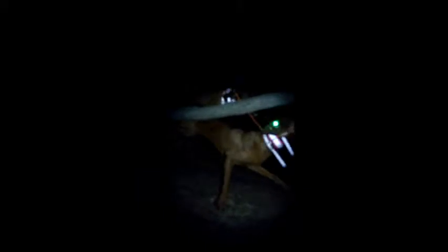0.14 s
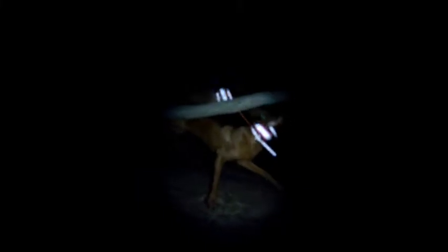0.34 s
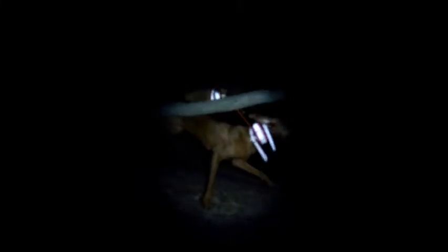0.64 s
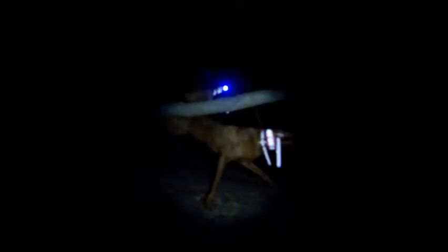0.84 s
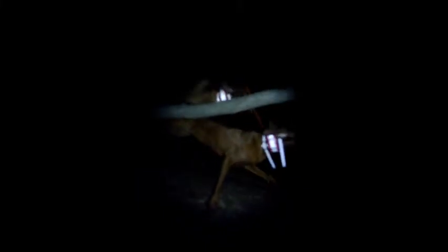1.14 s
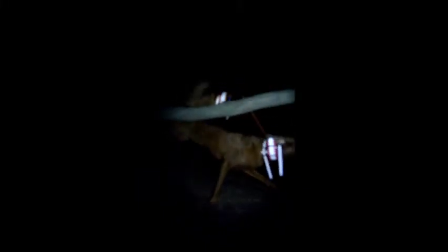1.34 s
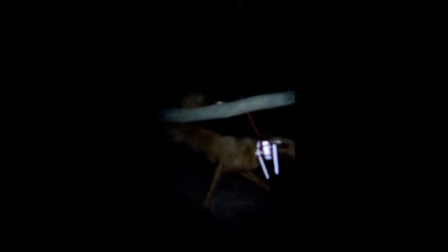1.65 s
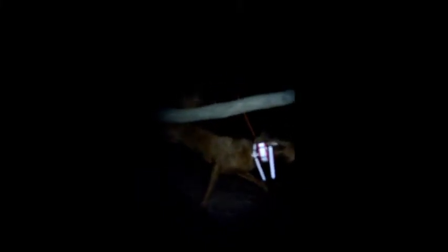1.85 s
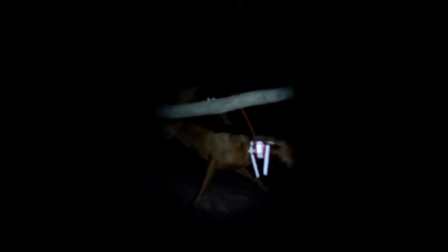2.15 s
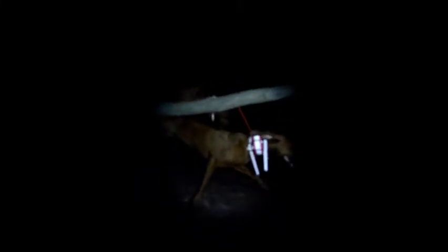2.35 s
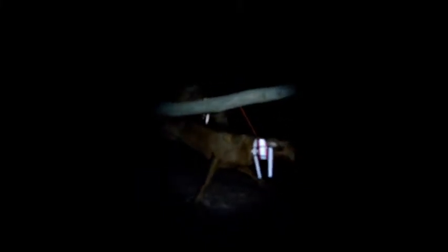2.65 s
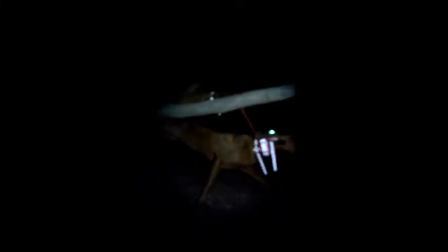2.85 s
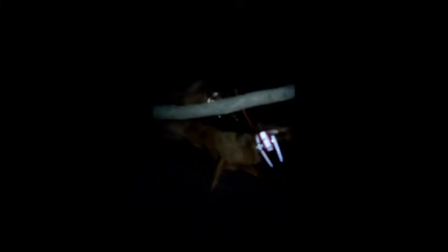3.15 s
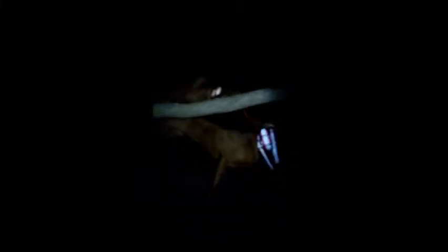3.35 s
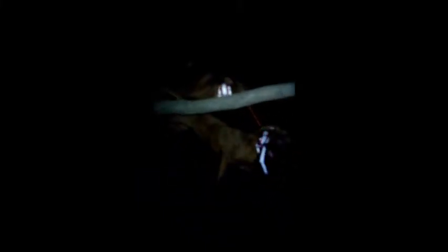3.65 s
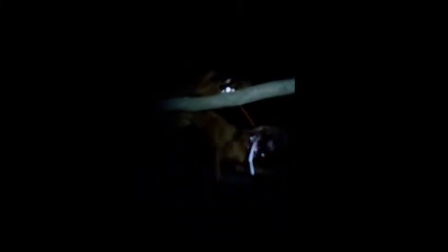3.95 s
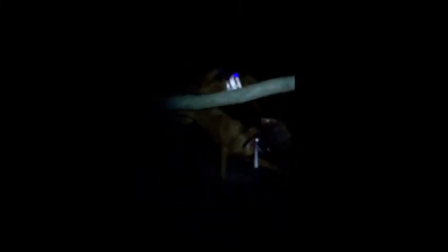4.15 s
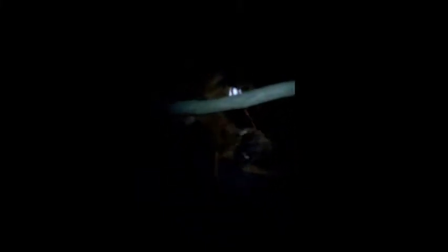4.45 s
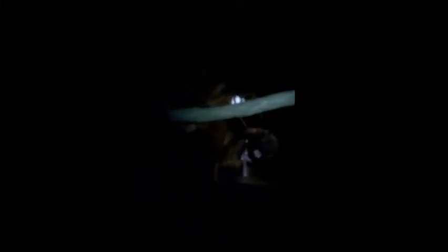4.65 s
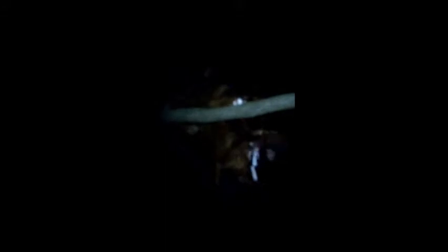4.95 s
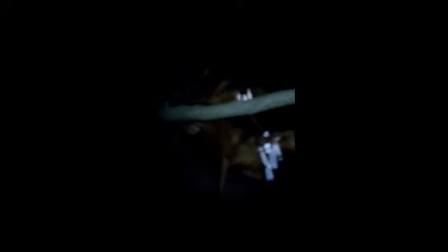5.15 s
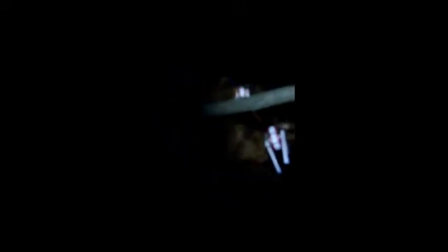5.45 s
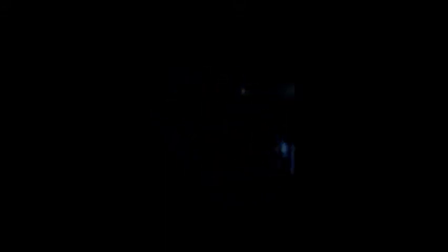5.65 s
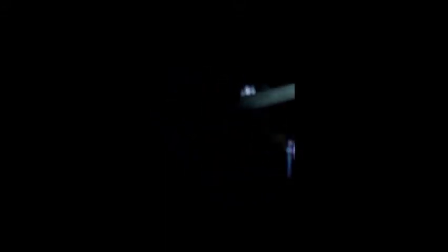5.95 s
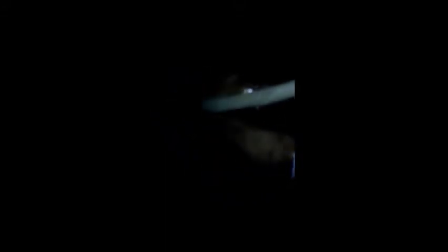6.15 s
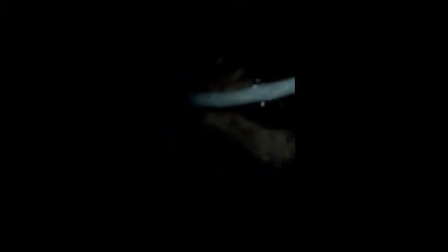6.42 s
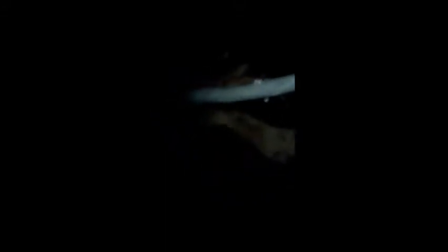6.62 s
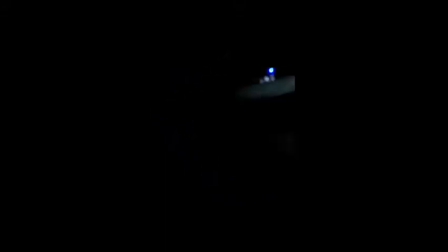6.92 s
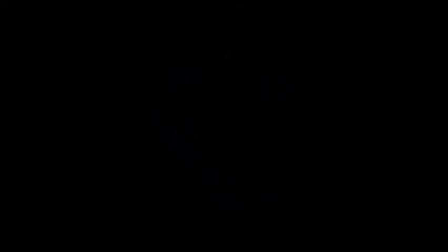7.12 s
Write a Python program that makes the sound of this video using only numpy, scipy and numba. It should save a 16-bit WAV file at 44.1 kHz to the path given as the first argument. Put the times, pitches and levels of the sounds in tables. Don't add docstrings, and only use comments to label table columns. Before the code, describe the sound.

Two hounds bark over each other outdoors at night, one with sharp high yelps, the other with deeper hoarse bays, over faint leaf rustle.

```python
import sys
import numpy as np
from scipy import signal
from scipy.io import wavfile
from scipy.ndimage import uniform_filter1d
from numba import njit

SR = 44100
rng = np.random.default_rng(int(sys.argv[2]) if len(sys.argv) > 2 else 0)


def boost(x):
    u = np.asarray(x, float) / 20
    return 10 ** u


def store_pcm(level_fs):
    pcm = np.round(np.clip(level_fs, -1, 1) * 32767).astype(np.int16)
    wavfile.write(sys.argv[1], SR, np.atleast_2d(pcm).T)


N = 321048


def rms_one(x):
    return x / np.sqrt(np.mean(x ** 2) + 1e-20)


def in_time(rows):
    s, *columns = np.transpose(rows)
    return [np.interp(np.arange(N) / SR, s, c) for c in columns]


def band(x, low_hz, high_hz, order=2):
    edges_hz = [low_hz, min(high_hz, SR / 2.2)]
    return signal.sosfilt(signal.butter(order, edges_hz, "band", fs=SR, output="sos"), x)


def wobble(hz):
    r = np.exp(-2 * np.pi * hz / SR)
    noise = rng.standard_normal(N + SR)
    return rms_one(signal.lfilter([1], [1, -2 * r, r * r], noise)[SR:])


def puff_of_air(start_s, length_s):
    t = np.arange(N) / SR
    return np.exp(-((t - start_s) * 2 / length_s) ** 2)


# time_s, level_db
HISS_AND_RUSTLE = [(0.0, -76), (0.4, -66.5), (0.56, -86.5), (0.83, -79.5), (0.93, -70), (1.64, -77),
                   (1.76, -89), (2.03, -88), (2.17, -73), (2.57, -76.5), (2.76, -63.5), (3.95, -97.5),
                   (4.16, -71), (6.24, -75.5), (6.43, -89), (6.65, -92), (6.77, -76), (7.28, -80.5)]
# centre_s, length_s, level_db
WIND_GUSTS = [
    (1.015, 0.15, -43),
    (1.172, .12, -37.5),
    (2.946, 0.082, -48),
    (3.527, .08, -60),
    (4.664, 0.11, -64),
    (5.11, .14, -47),
]


def night(dogs):
    stir_db, = in_time(HISS_AND_RUSTLE)
    bark = np.sqrt(np.abs(uniform_filter1d(dogs ** 2, size=int(.05 * SR))))
    gusts = sum(boost(db) * puff_of_air(s, length) for s, length, db in WIND_GUSTS)

    wind = rms_one(band(rng.standard_normal(N), 28, 120) * boost(4 * wobble(12)))
    hiss = rms_one(band(rng.standard_normal(N), 2600, 25000) * boost(2.6 * wobble(40)))
    rustle = rms_one(band(rng.standard_normal(N), 1700, 3800) * boost(3.7 * wobble(60)))
    hum = rms_one(band(rng.standard_normal(N), 270, 1000, order=1))

    wind_level = boost(-78.5) + gusts + boost(-39.5) * bark
    hiss_level = boost(stir_db + 0.5) + boost(-48.5) * bark
    rustle_db = -3 + stir_db + 1.1 * (stir_db - stir_db.mean())
    return wind_level * wind + hiss_level * hiss + boost(rustle_db) * rustle + boost(-71.5) * hum


# start_s, peak_db, pitch_hz
LEAF_TICKS = [(2.532, -48.5, 3325), (3.1203, -47, 2170), (3.1732, -47.5, 12920), (3.2925, -48, 6370),
              (3.326, -46, 9130), (3.5367, -52, 2013), (4.4, -39, 2001), (4.552, -39, 2810),
              (4.5741, -45, 2103), (4.6065, -45.5, 2049), (4.6552, -43.5, 2070), (4.7197, -58, 2203),
              (5.597, -63, 3460), (5.8975, -58.5, 2623), (6.121, -53.5, 2524)]


def ticks():
    out, t = np.zeros(N), np.arange(400) / SR
    for (s, db, hz), snap in zip(LEAF_TICKS, rng.standard_normal((len(LEAF_TICKS), 400))):
        at = round(s * SR)
        snap = rms_one(band(snap, hz / 2, hz * 2, order=1))
        out[at:at + 400] += boost(db - 7) * snap * np.exp(-t / 0.0016)
    return out


# centre_hz, level_db, t60_s
TRUNK_SCATTER = [
    (185, 3, 0.96),
    (520, -6.5, 1.24),
    (800, -13, 1.5),
    (1310, 10, 0.6),
    (3000, -18.5, 0.27),
    (6000, -17, .6),
]


def woods(x):
    t = np.arange(SR * 3 // 2) / SR
    scatter = np.zeros(len(t))
    for hz, db, t60 in TRUNK_SCATTER:
        noise = rms_one(band(rng.standard_normal(len(t)), hz / 1.4, hz * 1.4))
        scatter += boost(db - 60 * t / t60) * noise
    scatter *= 1 - np.exp(-t / 0.11)
    return signal.fftconvolve(x, scatter)[:N] / np.sqrt(SR)


# delay_s, level_db
EARLY_ECHOES = [
    (.0031, -24),
    (.0087, -21),
    (.0173, -17.5),
    (.029, -19.5),
    (.046, -22),
]


def echoes(x):
    out = x.copy()
    for k, (delay, db) in enumerate(EARLY_ECHOES):
        lag = round(delay * SR)
        out[lag:] += boost(db) * (-1) ** k * x[:-lag]
    return out


# centre_s, length_s,
# level_db, pitch_hz
SOFT_SWELLS = [
    (.0, 0.057, -57, 2040),
    (.0, 0.9, -54.5, 680),
    (0.615, 0.06, -58.5, 2185),
    (1.22, 0.1, -63.5, 2200),
    (3.099, 0.032, -66, 2141),
    (3.715, 0.042, -62, 1740),
    (4.656, 0.077, -55, 918),
    (4.963, 0.058, -85, 2300),
]


def gasps():
    air = rng.standard_normal(N)
    return sum(boost(db) * puff_of_air(s, length) * rms_one(band(air, hz / 1.25, hz * 1.25))
               for s, length, db, hz in SOFT_SWELLS)


@njit
def moving_resonance(x, twice_r_cos, r):
    y = np.zeros(len(x))
    for i in range(2, len(x)):
        y[i] = (1 - r * r) / 2 * (x[i] - x[i - 2]) + twice_r_cos[i] * y[i - 1] - r * r * y[i - 2]
    return y


def resonance(x, hz, width_hz):
    r = np.exp(-np.pi * width_hz / SR)
    return moving_resonance(x, 2 * r * np.cos(2 * np.pi * hz / SR) * np.ones(N), r)


def voice_breaks(breaks):
    t = np.arange(N) / SR
    chaos, half = np.full(N, .06), np.zeros(N)
    for start, end, amount, alternation in breaks:
        broken = np.interp(t, [start - .004, start + .004, end - .015, end + .015], [0, 1, 1, 0])
        chaos, half = chaos + amount * broken, half + alternation * broken
    return chaos, half


def upper_cavities(grainy, top):
    out = np.zeros(N)
    for hz, width_hz, db in top:
        once = resonance(grainy, hz, 1.5 * width_hz)
        out += boost(db) * resonance(once, hz, 1.5 * width_hz)
    return out


def bark_gate(barks):
    t, gate = np.arange(N) / SR, np.zeros(N)
    for bark in barks:
        first, last = bark[0][0], bark[-1][0]
        gate = np.maximum(gate, np.clip(1 + np.minimum(t - first, last - t) / .003, 0, 1))
    return gate


def dog(barks, breaks, throat, top, pitch_spread, strength_spread_db, widths_hz, cut_hz, upper_ratio,
        upper_db, slope_db, breath_db, rasp_db, clear_top_db, whisper_db):
    t = np.arange(N) / SR
    chaos, half = voice_breaks(breaks)
    rows = np.array(sorted(row for bark in barks for row in bark))
    pitch_hz, _, mouth_hz, open_db = in_time(rows)
    level = np.interp(t, rows[:, 0], boost(rows[:, 2] / 3)) ** 3
    upper_hz = np.clip(upper_ratio * pitch_hz, 1000, 2100)
    mouth_hz = uniform_filter1d(mouth_hz, size=500) * np.exp(.08 * chaos * wobble(30))

    turn = 2 * np.pi * np.cumsum(pitch_hz * np.exp(pitch_spread * chaos * wobble(80))) / SR
    per_khz_db = np.clip(slope_db + 0.9 * (open_db + 14.5), -30, -2.2)
    fall = boost(per_khz_db * pitch_hz / 1000)
    puffs = (1 - fall ** 2) / (1 - 2 * fall * np.cos(turn) + fall ** 2)
    unevenness = boost(strength_spread_db * chaos * np.tanh(wobble(40)))
    strength = (1 + half * np.cos(turn / 2)) * unevenness

    air = rng.standard_normal(N) * puffs ** 0.028
    breath = band(air, 460, 1100)
    breath += boost(np.minimum(open_db + 15.0, 3)) * band(air, 1100, 4200, order=1)
    source = strength * (puffs - 1) + boost(breath_db) * (chaos + 0.009) * breath

    voice = resonance(source, mouth_hz, widths_hz[0])
    voice += boost(upper_db) * resonance(source, upper_hz, widths_hz[1])
    for hz, width_hz, db in throat:
        voice += boost(db) * resonance(source, hz, width_hz)
    voice = signal.sosfilt(signal.butter(8, cut_hz, fs=SR, output="sos"), voice)

    grainy = source + boost(whisper_db) * air * boost(3 * wobble(25))
    top_level = boost(clear_top_db * (3.5 - np.clip(2 * chaos, 0, 1)))
    voice += top_level * upper_cavities(grainy, top)
    voice += boost(rasp_db) * band(air * boost(2.7 * wobble(35)), 4000, 14000, order=1)
    voice = signal.sosfilt(signal.butter(3, 360, "high", fs=SR, output="sos"), voice)

    voice /= np.sqrt(uniform_filter1d(voice ** 2, size=900) + 1e-9)
    voice *= boost(strength_spread_db * chaos * np.tanh(wobble(22)) * .8)
    closed = np.clip((270 - pitch_hz) / 80, .02, .95)
    voice = (1 - closed) * voice + closed * np.sqrt(2) * strength * np.cos(turn)
    return voice * bark_gate(barks) * level


# start_s, top_s, top_pitch_hz, top_level_db, mouth_hz
BAY_RISES = [(.27, .385, 405.5, -18, 814), (0.87, .99, 393, -19, 780), (1.541, 1.678, 465.7, -21.5, 501.7),
             (2.128, 2.238, 441.3, -21.5, 496), (2.731, 2.833, 400, -23.5, 762),
             (3.361, 3.46, 385.6, -20.5, 790), (3.982, 4.133, 416.5, -18, 809),
             (5.044, 5.145, 391.3, -20.5, 800), (5.715, 5.808, 404.6, -17.5, 853),
             (6.735, 6.843, 411.5, -16.5, 791)]
# sag_s, end_s, held_pitch_hz, held_level_db, jaw_opening_db
BAY_HOLDS = [(.499, .575, 451.6, -19.5, -23), (1.12, 1.191, 422.2, -21.5, -22),
             (1.765, 1.86, 431, -26.5, -23.5), (2.335, 2.438, 439, -22, -34.5),
             (2.97, 3.052, 433.2, -25, -23.5), (3.58, 3.663, 423.8, -24, -24.5),
             (4.23, 4.285, 427.6, -18.5, -36.5), (5.26, 5.345, 482, -22, -43),
             (5.915, 6.003, 420.8, -23.5, -30), (6.96, 7.05, 460, -23, -39.5)]
# share_of_rise, share_of_top_pitch, level_under_top_db
BAY_SWELL = [
    (0.149, .69, -15.5),
    (.42, 0.74, -5),
    (.68, .92, -4),
    (.88, 0.96, 1.5),
]
# share_of_sag, share_of_held_pitch, level_change_db, jaw_opening_added_db
BAY_SINK = [
    (0, 0.98, -3.5, -2.5),
    (.5, 0.59, -15, 5),
    (1.001, 0.4, -35.5, 2.5),
]


def bays():
    barks, start_mouth_hz, start_open_db = [], 690, -13
    for (start, top, hz, db, mouth_hz), (sag, end, held_hz, held_db, held_open_db) in zip(BAY_RISES, BAY_HOLDS):
        open_db = -5 + 0.08 * (mouth_hz - 780)
        narrow_hz = 619 + 0.19 * (mouth_hz - 780)
        bark = [(start, hz * BAY_SWELL[0][1] * 0.74, db - 29, start_mouth_hz, start_open_db)]
        for part, share, under_db in BAY_SWELL:
            bark.append((start + part * (top - start), hz * share, db + under_db,
                         start_mouth_hz + part ** 2 * (mouth_hz - start_mouth_hz),
                         start_open_db + part ** 2 * (open_db - start_open_db)))
        bark += [(top, hz, db, mouth_hz, open_db),
                 (top + .005, held_hz, held_db - 3.5, narrow_hz, held_open_db + 11),
                 ((top + sag) / 2, held_hz, held_db, narrow_hz, held_open_db)]
        for part, share, change_db, more_db in BAY_SINK:
            bark.append((sag + part * (end - sag), held_hz * share, held_db + change_db, narrow_hz,
                         held_open_db + more_db))
        barks.append(bark)
    return barks


# break_s, clear_s, chaos (0-1), half_lines (0-1)
BAY_CRACKS = [(.392, .53, .45, .7), (.995, 1.15, .4, .7), (1.672, 1.79, .14, .5), (2.235, 2.36, .12, .5),
              (2.875, 2.99, .5, .5), (3.5, 3.63, .55, .5), (4.14, 4.27, .6, .5), (5.15, 5.3, .55, .6),
              (5.83, 5.96, .55, .5), (6.855, 7.0, .55, .5)]
# centre_hz, width_hz, level_db
DEEP_THROAT = [
    (525, 25, -21.5),
    (1535, 260, -10),
    (2017, 120, -2.5),
]
# centre_hz, width_hz, level_db
DEEP_TOP = [
    (2947, 280, -12.5),
    (4844, 750, -20.5),
    (5500, 400, -12.5),
    (6230, 2000, -19),
]


def deep_dog():
    return dog(bays(), BAY_CRACKS, DEEP_THROAT, DEEP_TOP, pitch_spread=.14, strength_spread_db=11,
               widths_hz=(120, 170), cut_hz=1860, upper_ratio=2.685, upper_db=-1.5, slope_db=-9.5,
               breath_db=6.5, rasp_db=-60.5, clear_top_db=-4.5, whisper_db=-12.5)


# start_s, top_s, top_pitch_hz, top_level_db
YELP_RISES = [(.165, .2, 667, -16.5), (.752, 0.798, 678, -15), (1.355, 1.4, 661.5, -11),
              (1.985, 2.029, 691.6, -10.5), (2.601, 2.643, 691.7, -11.5), (4.052, 4.134, 1016, -9),
              (5.085, 5.124, 700, -14), (5.635, 5.683, 670, -18), (6.2, 6.26, 990, -16.5),
              (6.578, 6.626, 637.5, -19.5), (7.178, 7.221, 670, -18)]
# end_s, pitch_hz, level_db, mouth_hz
YELP_STRAINS = [(.29, 520, -18, 720), (.9, 500, -19.5, 800), (1.535, 490, -19, 902),
                (2.145, 490, -22.5, 933), (2.77, 500, -20.5, 954), (4.255, 1044, -21.5, 880),
                (5.201, 495, -15, 905), (5.78, 557.9, -20.5, 888), (6.365, 1003, -22.5, 812),
                (6.74, 490, -23, 910), (7.33, 612.4, -19.5, 922)]
# share_of_rise, share_of_glide, level_under_top_db, jaw_opening_db
YELP_SWELL = [
    (0, 0, -44, -20),
    (0.499, .7, -10.5, -9.5),
    (0.819, .93, -0.5, -8),
    (1, 0.99, -4.5, -10),
]
# time_s, pitch_hz, level_db, mouth_hz, jaw_opening_db
SHUT_WHINE = [
    (6.396, 240, -37.5, 796, -3.5),
    (6.437, 172.3, -47, 810, -14.5),
    (6.485, 170.2, -55, 800, -30),
    (6.51, 300.5, -50, 645, -19),
    (6.545, 326.8, -54, 634, -19),
]


def yelps():
    barks, start_hz = [SHUT_WHINE], 540
    for (start, top, hz, db), (end, low_hz, low_db, mouth_hz) in zip(YELP_RISES, YELP_STRAINS):
        wider_db = .02 * (hz - 680)
        bark = [(start + part * (top - start), start_hz + share * (hz - start_hz), db + under_db, hz * .97,
                 open_db + wider_db)
                for part, share, under_db, open_db in YELP_SWELL]
        bark += [(top + .006, hz * .98, db - 2.5, mouth_hz * 1.035, -5.5),
                 (top + .04, low_hz, low_db, mouth_hz, -21.5),
                 (end, low_hz * .86, low_db - 8, mouth_hz * 1.003, -19),
                 (end + .025, low_hz * .75, low_db - 20.5, mouth_hz * 0.83, -25)]
        barks.append(bark)
    return barks


# break_s, clear_s, chaos (0-1), half_lines (0-1)
YELP_CRACKS = [(.2, .3, .7, .4), (.772, .9, .55, .6), (1.4, 1.57, .7, .4), (2.028, 2.15, .7, .4),
               (2.645, 2.72, .7, .4), (4.142, 4.29, .85, .5), (5.128, 5.2, .7, .5), (5.672, 5.77, .75, .5),
               (6.27, 6.4, .6, .9), (6.628, 6.72, .7, .4), (7.222, 7.3, .75, .4)]
# centre_hz, width_hz, level_db
HIGH_THROAT = [
    (495, 42, -12),
    (1490, 2200, -20.5),
    (2300, 120, -20.5),
    (2601, 160, -11.5),
]
# centre_hz, width_hz, level_db
HIGH_TOP = [
    (4724, 660, -33),
    (5100, 250, -32.5),
    (6200, 930, -34),
    (7050, 390, -35),
]


def high_dog():
    return dog(yelps(), YELP_CRACKS, HIGH_THROAT, HIGH_TOP, pitch_spread=.17, strength_spread_db=8,
               widths_hz=(170, 300), cut_hz=2284, upper_ratio=2.23, upper_db=-9.5, slope_db=-8.5,
               breath_db=14.5, rasp_db=-41.5, clear_top_db=0.5, whisper_db=-10.5)


def scene():
    dogs = high_dog() + deep_dog()
    mix = night(dogs) + ticks() + boost(-25) * woods(dogs) + gasps() + echoes(dogs)
    return mix[None]


def top_cut(x):
    return signal.sosfilt(signal.butter(12, 15760, fs=SR, output="sos"), x)


def record(dry):
    rounded = dry / (1 + (np.abs(dry) / .8) ** 6) ** (1 / 6)
    return top_cut(rounded)


dry = scene()
out = record(dry)
store_pcm(out)
```